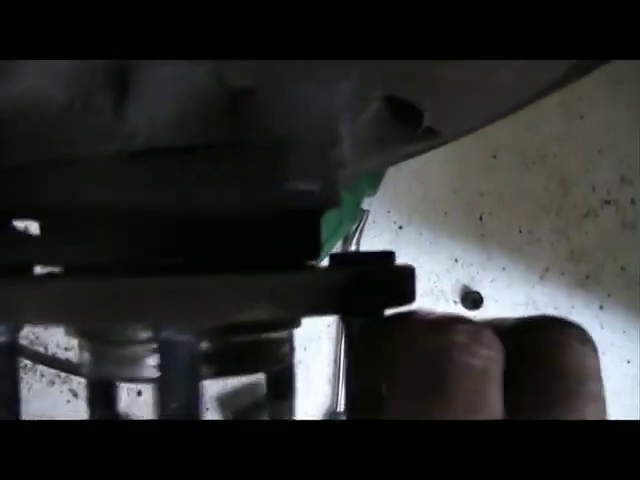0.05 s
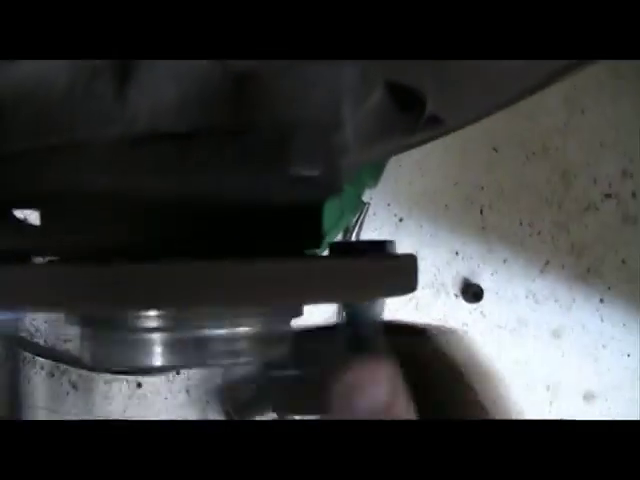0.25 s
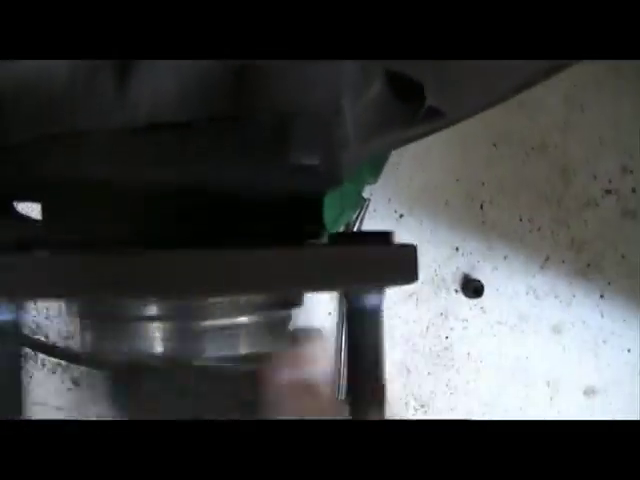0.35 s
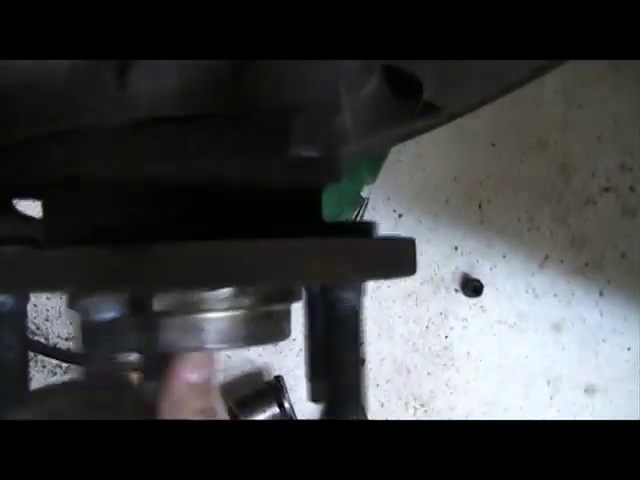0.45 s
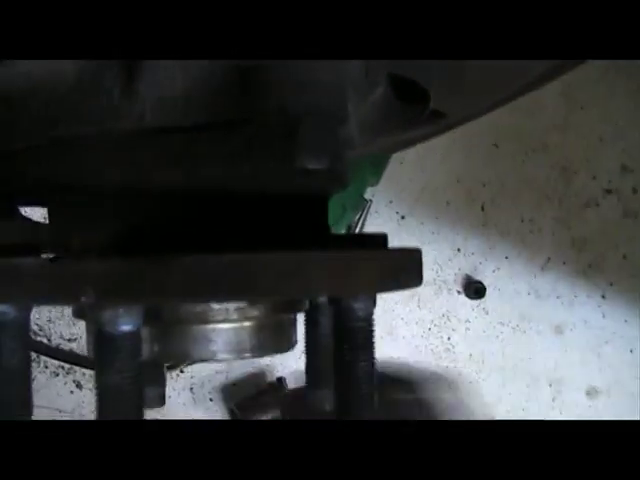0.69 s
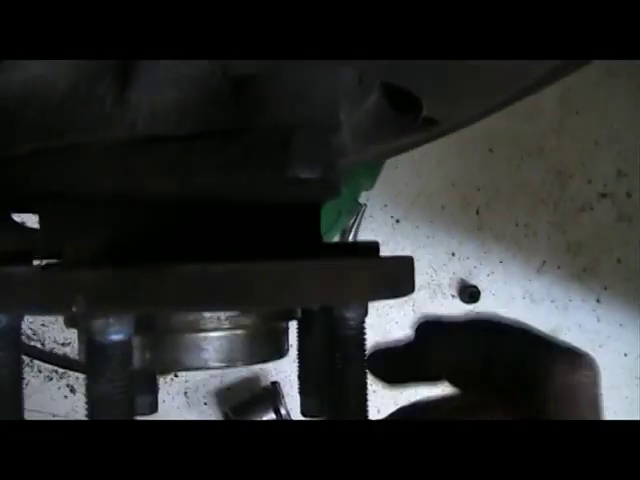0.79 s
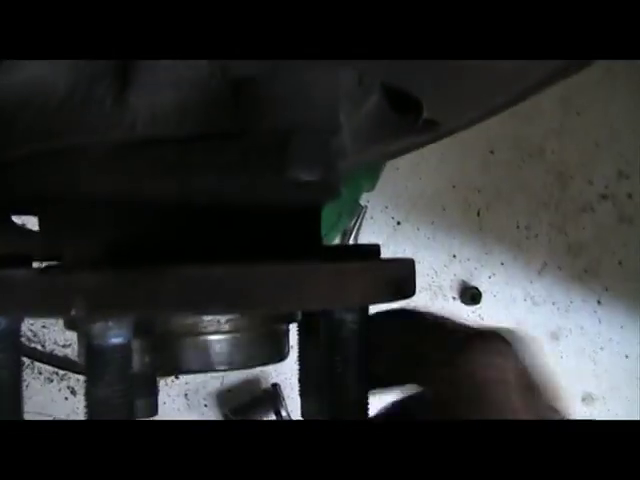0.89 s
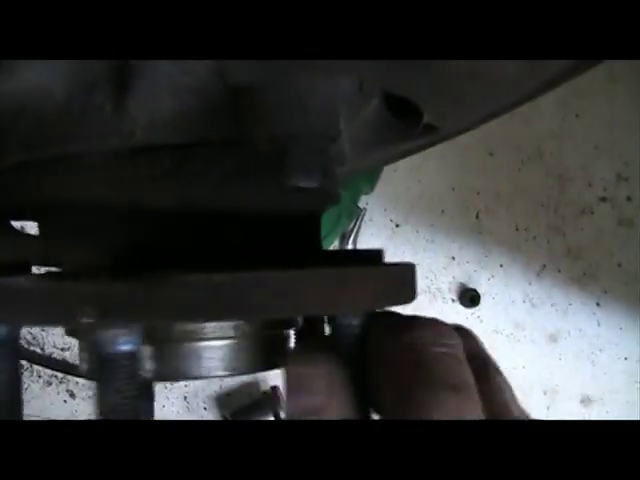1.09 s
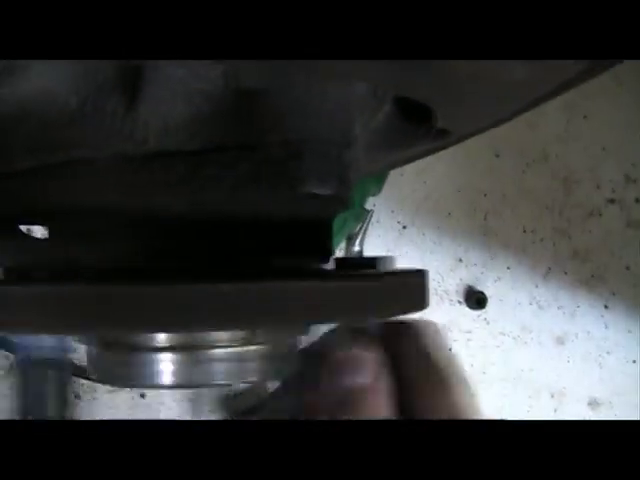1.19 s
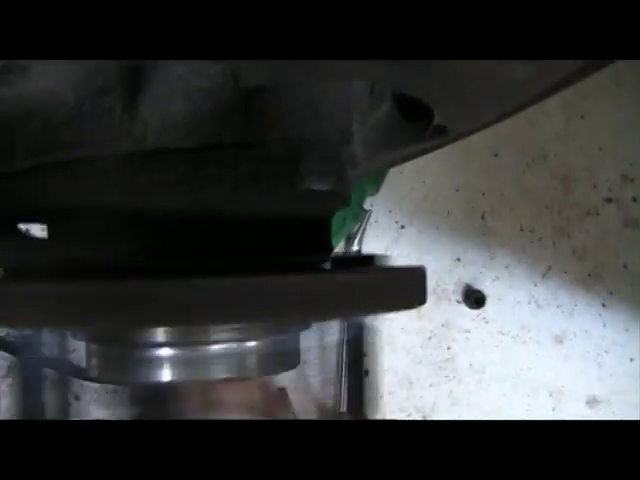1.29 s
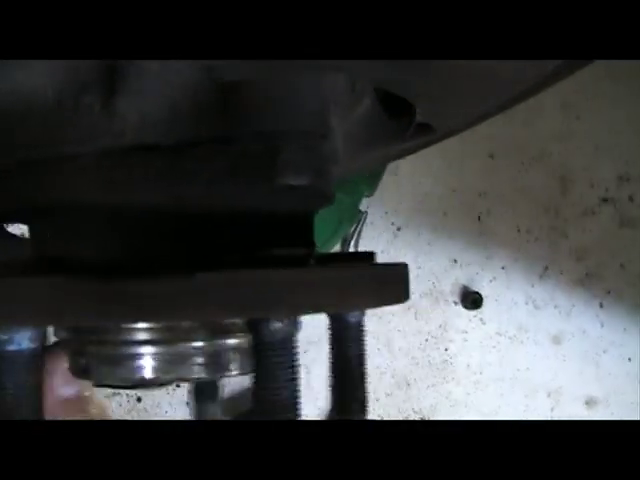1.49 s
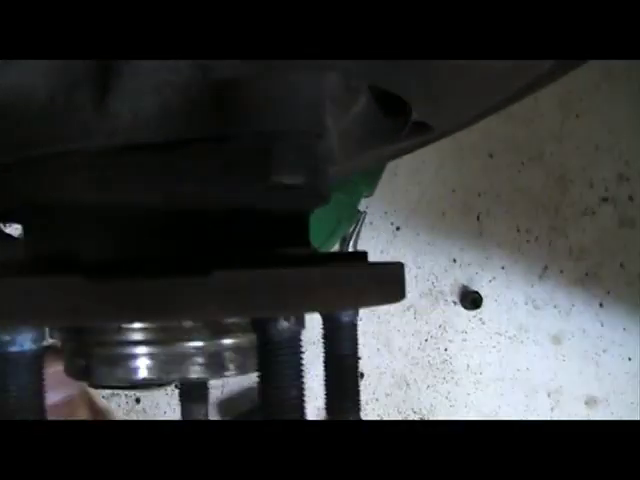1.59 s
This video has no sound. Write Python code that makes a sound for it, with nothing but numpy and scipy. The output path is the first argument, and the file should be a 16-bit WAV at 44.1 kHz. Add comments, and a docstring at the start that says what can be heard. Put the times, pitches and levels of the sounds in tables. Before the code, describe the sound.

A steel wheel hub grinds and rumbles on a worn bearing as a hand turns it twice, close by in a workshop. The first turn ends in a sharp knock with a brief metallic ring; the second fades into a faint whine.

```python
"""A dry scrape swells into a grinding rumble: a steel wheel hub is turned twice by hand, close by in a workshop.
Rollers bump over the worn bearing and shake the suspension; grit crunches and the bearing catches.
The first turn ends in a sharp knock that leaves the hub ringing. After each push the hub coasts with
a drone and a thin whine, and between turns the hand brushes the metal as it takes a new grip."""
import sys
import numpy as np
from scipy import signal
from scipy.fft import rfft, irfft
from scipy.io import wavfile
from scipy.ndimage import uniform_filter1d

SR = 44100
rng = np.random.default_rng(int(sys.argv[2]) if len(sys.argv) > 2 else 0)


def transcribe(u):
    """Save the signal u as a 16-bit wav file named by the first command-line argument.

    u: samples, shape (n,) or (channels, n), limited to [-1, 1]; the rate is SR.
    q: integer samples, one column per channel.
    """
    v = np.clip(np.atleast_2d(u).T, -1, 1)
    q = np.round(v * 32767).astype(np.int16)
    wavfile.write(sys.argv[1], SR, q)


N = 72765
T = np.arange(N) / SR
HZ = np.fft.rfftfreq(2 * N, 1 / SR)


def amp(db):
    """Decibels to gain."""
    return 10 ** (np.asarray(db) / 20)


def unit(x):
    """Scales to rms 1."""
    return x / np.sqrt(np.mean(x ** 2) + 1e-20)


def read(points, hz):
    """Reads a table on a log-frequency axis."""
    f, value = np.transpose(points)
    return np.interp(np.log(hz + 1), np.log(f + 1), value)


def band(hz, octaves):
    """A bell-shaped EQ curve in dB."""
    return np.maximum(-10 * np.log10(np.e) * (np.log2((HZ + 1) / hz) / octaves) ** 2, -70)


def eq(x, db):
    """Filters by a gain in dB at every frequency."""
    return irfft(rfft(x, 2 * N) * amp(db))[..., :N]


def noise(db):
    """Noise of rms 1 with a given colour."""
    return unit(eq(rng.standard_normal(N), db))


def sine(hz, t=T):
    """A sine with a random starting phase."""
    return np.sin(2 * np.pi * (hz * t + rng.random()))


def grains(per_s, spread_db):
    """Random contacts of uneven size and sign."""
    size = amp(spread_db * np.minimum(rng.exponential(1, N), 4))
    return size * rng.choice([-1., 1.], N) * (rng.random(N) < per_s / SR)


def fader(curves):
    """Gain over time from dB curves."""
    return sum(amp(np.interp(T, *np.transpose(c), left=-120, right=-120)) for c in curves)


def strike(start, rise, t60):
    """Envelope with a linear attack and an exponential decay."""
    return np.clip((T - start) / rise, 0, 1) * amp(-60 * np.maximum(T - start - rise, 0) / t60)


def swell(peak_s, half_s):
    """A smooth, bell-shaped envelope."""
    return np.exp(-.5 * ((T - peak_s) / half_s) ** 2)


def excite(x, response):
    """Plays a signal through an impulse response."""
    return signal.fftconvolve(x, response)[:N]


def dying(x, t60s):
    """Lets each band die at its own speed."""
    hz, t, z = signal.stft(x, SR, nperseg=256)
    return signal.istft(z * amp(-60 * t / read(t60s, hz)[:, None]), SR, nperseg=256)[1][:N]


# colour of the room tone, and extra EQ on its stereo side (frequency [Hz], gain [dB])
AIR_EQ = [(20, -8), (55, -3), (240, -1), (320, -4), (1100, -11), (1750, -8), (2300, -12), (4400, -18),
          (10700, -21.5), (16000, -27.5)]
AIR_SIDE_EQ = [(60, -3), (250, 6.5), (14000, 1.5)]
# hum partials (frequency [Hz], level [dB])
HUM_PARTIALS = [(120, -67.5), (240, -62), (360, -70), (600, -69.5)]
def room_tone():
    """Steady workshop air with a low hum."""
    air, side = (amp(-58) * noise(read(AIR_EQ, HZ)) for _ in range(2))
    side = eq(side, read(AIR_SIDE_EQ, HZ))
    hum = sum(np.sqrt(2) * amp(db) * sine(hz) for hz, db in HUM_PARTIALS)
    return air + hum + np.array([side, -side])


# colour of the surrounding steel's high modes (frequency [Hz], gain [dB])
STEEL_EQ = [(1500, -37), (3000, -2.5), (4600, 0.5), (7000, -1), (13000, -35)]
def steel_response(count=150):
    """Impulse response of many random modes; the higher ones die sooner."""
    t = T[:SR // 2]
    hz = np.geomspace(1500, 14000, count) * rng.uniform(.98, 1.02, count)
    db = read(STEEL_EQ, hz) + 3 * rng.standard_normal(count)
    t60 = 0.52 * (hz / 1000) ** -0.49
    modes = sum(amp(d - 60 * t / life) * sine(f, t) for f, d, life in zip(hz, db, t60))
    return modes / np.linalg.norm(amp(db))


GRIP_T60_S = .06  # extra decay from the gripping hand
# scrape envelope, one curve per turn (time [s], relative level [dB])
SCRAPE_CURVES = [
    [(0, -59), (.11, -53.5), (.195, -49), (.212, -38.5), (.255, -41.5), (.28, -38), (.305, -39.5),
     (.338, -34), (.355, -48), (.42, -45), (.47, -65.5), (.62, -68.5), (.80, -60), (1.0, -63)],
    [(1.04, -64), (1.16, -46.5), (1.19, -37), (1.25, -42), (1.30, -38), (1.35, -42.5), (1.364, -35),
     (1.385, -42.5), (1.40, -37.5), (1.412, -53), (1.47, -63), (1.65, -61.5)],
]
# scrape colour (frequency [Hz], gain [dB])
SCRAPE_EQ = [(500, 11), (1800, -10), (3000, -3), (4300, -1), (6500, 0.5), (8500, 5.5), (10500, 0),
             (13000, -3.5), (15500, -18)]
def scrape(steel):
    """Dry steel slides in thousands of tiny slips, which stir the hand-damped metal."""
    slips = unit(eq(grains(per_s=7700, spread_db=2), read(SCRAPE_EQ, HZ)))
    gripped = steel * amp(-60 * T[:len(steel)] / GRIP_T60_S)
    sheen = amp(-3) * unit(excite(slips, gripped))
    return amp(-2) * fader(SCRAPE_CURVES) * (slips + sheen)


# turning effort, one curve per turn (time [s], relative level [dB])
EFFORT_CURVES = [
    [(.08, -66), (.165, -42.5), (.205, -33.5), (.24, -24), (.285, -18.5), (.31, -23.5), (.355, -21),
     (.40, -24.5), (.45, -41.5), (.56, -58)],
    [(1.08, -63), (1.15, -41.5), (1.178, -27.5), (1.205, -22), (1.25, -21.5), (1.29, -24), (1.335, -28),
     (1.37, -26), (1.40, -33.5), (1.43, -43), (1.55, -63)],
]
# low resonances of hub and suspension (frequency [Hz], relative level [dB], t60 [s])
LOW_MODES = [(53.5, -24, 0.37), (102.4, -25.5, 0.46), (147.5, -23.5, 1), (207.2, -6.5, 0.3),
             (238.3, -2, 0.2), (273, 1, 0.12), (291.8, 0.5, 0.13), (327.8, 1.5, 0.11), (375.2, -4, 0.28),
             (403.3, -8, 0.26), (432.3, -5, 0.1)]
def rumble():
    """Rollers bump over the worn race and shake the low resonances."""
    body = sum((-1) ** k * amp(db - 60 * T / t60) * np.sin(2 * np.pi * hz * T) / np.sqrt(t60)
               for k, (hz, db, t60) in enumerate(LOW_MODES))
    shaking = unit(excite(grains(per_s=680, spread_db=4.5), body))
    power = abs(uniform_filter1d(shaking ** 2, int(0.0198 * SR)))
    shaking /= np.sqrt(power + 0.028)  # compress, so the effort sets the dynamics
    return amp(-2) * fader(EFFORT_CURVES) * shaking


# drone envelope, one curve per turn (time [s], level [dB])
DRONE_CURVES = [
    [(.1, -64), (.27, -45.5), (.44, -39.5), (.56, -62.5), (.69, -50), (1.0, -66)],
    [(1.1, -57), (1.25, -37), (1.40, -42.5), (1.48, -54), (1.65, -58)],
]
def drone():
    """The spinning hub drones hollowly under the rumble and carries on after each push."""
    return fader(DRONE_CURVES) * noise(band(160, octaves=0.36))


# crunch envelope, one curve per turn (time [s], level [dB])
GRIT_CURVES = [
    [(.12, -68), (.21, -45.5), (.24, -42), (.287, -31), (.305, -36), (.36, -37), (.46, -60)],
    [(1.14, -53.5), (1.222, -47.5), (1.25, -36.5), (1.275, -41), (1.315, -40.5), (1.38, -50), (1.43, -58.5)],
]
# crunch colour (frequency [Hz], gain [dB])
GRIT_EQ = [(200, -13), (500, 4), (740, 4.5), (860, -6.5), (1030, 6.5), (1180, -9), (1340, 3.5),
           (3000, -16.5), (5000, -10), (9000, -30)]
def grit():
    """Grit is crushed at the height of each push and makes the gripped hub sing."""
    cracks = grains(per_s=1000, spread_db=2)
    crunch = unit(eq(cracks, read(GRIT_EQ, HZ)))
    gripped = sum(amp(db - 60 * T * (1 / t60 + 1 / GRIP_T60_S)) * sine(hz) for hz, db, t60 in HUB_MODES)
    sing = amp(-2.5) * unit(eq(excite(cracks, gripped), band(2460, octaves=1)))
    return fader(GRIT_CURVES) * (crunch + sing)


# finger scuffs (time [s], half length [s], level [dB])
FINGER_SCUFFS = [(0.156, 0.013, -45), (1.454, 0.011, -51.5)]
def scuffs():
    """Fingers scuff on the studs in soft puffs of noise."""
    envelope = sum(amp(db) * swell(s, half) for s, half, db in FINGER_SCUFFS)
    return envelope * noise(band(3600, octaves=0.86))


# bearing snaps, a small last blow of the first knock at 0.381 s, and a light knock of the hand around
# 1.227-1.246 s (time [s], level [dB], centre [Hz], width [octaves], t60 [s])
SNAPS_AND_SMALL_KNOCKS = [(0.266, -27.5, 7100, 0.58, .035), (0.282, -31, 1360, 0.08, 0.097),
                          (.381, -33.5, 3580, 0.18, 0.057), (1.176, -32, 6900, .63, 0.026),
                          (1.227, -31.5, 5370, 0.5, 0.076), (1.227, -25.5, 870, 0.73, 0.041),
                          (1.24, -34, 810, 0.33, 0.12), (1.2453, -33.5, 2920, 0.67, 0.077),
                          (1.246, -35, 4270, 0.078, 0.13), (1.3614, -37.5, 8700, 0.34, 0.12)]
def catches():
    """Short gritty snaps as the bearing sticks and lets go, with a small last blow of the first knock and a
    light knock of the hand in the second turn."""
    return sum(amp(db) * strike(s, 0.00041, t60) * noise(band(hz, width))
               for s, db, hz, width, t60 in SNAPS_AND_SMALL_KNOCKS)


def thump(start, size_db, rise_s=0.01146, decay_speed=0.73):
    """One shove shakes all the low resonances in phase; they ring longer than in the rumble."""
    since_peak = T - start - rise_s
    modes = sum(amp(db) * strike(start, rise_s, t60 / decay_speed) * np.sin(2 * np.pi * hz * since_peak)
                for hz, db, t60 in LOW_MODES)
    return amp(size_db) * modes / np.sqrt(len(LOW_MODES))


# low-end hits (time [s], relative level [dB])
SUSPENSION_JOLTS = [(.275, -21.5), (1.24, -19)]
def jolts():
    """A heavy jolt goes through the suspension at the height of each push."""
    return sum(thump(s, db) for s, db in SUSPENSION_JOLTS)


BLOW_RISE_S = 0.0007
# a glancing blow, then a full one (time [s], level [dB])
KNOCK_BLOWS = [(.3638, -26.5), (0.3672, -19.5)]
# colours of the contact crack and of the clang (frequency [Hz], gain [dB])
CRACK_EQ = [(400, -9), (4700, -3), (5900, 9), (7300, -3), (9500, -6), (10750, 1.5), (11900, -6),
            (13100, 8.5), (13800, -15)]
CLANG_EQ = [(150, -34), (500, 0), (1100, -0.5), (1400, 12.5), (1800, 0.5), (3000, -3), (7000, -1.5),
            (10000, -12), (15000, -40)]
# clang decay (frequency [Hz], t60 [s])
CLANG_DECAY = [(300, 0.22), (1200, 0.11), (4000, 0.061), (14000, 0.093)]
def knock(steel):
    """A bright crack at contact, a clang of dense modes at each blow, and a thump in the suspension."""
    hit = amp(-20) * strike(start=.3595, rise=0.0012, t60=0.053) * noise(read(CRACK_EQ, HZ))
    shimmer = amp(-14) * np.pad(steel, (0, N - len(steel)))
    for s, db in KNOCK_BLOWS:
        clang = dying(noise(read(CLANG_EQ, HZ)), CLANG_DECAY) + shimmer
        clang *= np.minimum(T / BLOW_RISE_S, 1)
        hit += amp(db) * np.pad(clang, (round(s * SR), 0))[:N]
    return hit + thump(start=.366, size_db=-14.5)


# ringing modes of the free hub (frequency [Hz], relative level [dB], t60 [s])
HUB_MODES = [(585, -8.5, 0.18), (766, -17, 0.68), (921, -19.5, 0.98), (978.4, 3, 0.066), (1381, 0, 0.49),
             (1449, -3.5, 0.23), (1633, -29.5, 1), (2108, -11.5, 0.22), (2336, -1.5, 0.14),
             (2845, -9.5, 0.19), (3473, -10, 0.22), (3580, -15, 0.31), (3870, -12, 0.21), (4035, -9, 0.17),
             (4256, -16, 0.16), (4760, -8, 0.14)]
def ring():
    """The hub rings on after the last blow."""
    start, _ = KNOCK_BLOWS[-1]
    modes = sum(amp(db) * strike(start, BLOW_RISE_S, t60) * sine(hz) for hz, db, t60 in HUB_MODES)
    return amp(-24.5) * modes


# the hand lets go (time [s])
RELEASE_TIMES = [0.46, 1.37]
# tones of the coasting hub: low bearing tones and thin high rings of the metal (frequency [Hz], level [dB])
WHINE_TONES = [(361, -54.5), (927, -65.5), (1620, -64), (6121, -67), (7752, -79), (11041, -77)]
def whine(waver_depth_hz=10, waver_rate_hz=19):
    """Thin, wavering tones of the bearing and the metal swell after each push and fade as the hub slows."""
    spin = sum(strike(s, rise=0.094, t60=2.06) for s in RELEASE_TIMES)
    tones = np.zeros(N)
    for hz, db in WHINE_TONES:
        pitch = hz + waver_depth_hz * noise(band(waver_rate_hz, octaves=1))
        tones += np.sqrt(2) * amp(db) * np.sin(2 * np.pi * np.cumsum(pitch) / SR)
    return spin * tones


# touches of the hand between turns (time [s], half length [s], level [dB])
HAND_BRUSHES = [(0.867, 0.0037, -57), (.94, 0.015, -49.5)]
# airy colour of skin on steel (frequency [Hz], gain [dB])
BRUSH_EQ = [(500, -27), (2500, -17), (3800, -5), (6000, -6.5), (9000, 5), (11500, -8)]
def brushes():
    """Skin slides lightly over the metal as the hand takes a new grip."""
    envelope = sum(amp(db) * swell(s, half) for s, half, db in HAND_BRUSHES)
    return envelope * noise(read(BRUSH_EQ, HZ))


# faint squeaks (time [s], half length [s], centre [Hz], level [dB])
BEARING_SQUEAKS = [(1.05, 0.014, 3340, -64), (1.614, 0.049, 3180, -60.5)]
def squeaks(steel):
    """The dry bearing rubs in a narrow band and stirs a few modes of the steel."""
    return sum(amp(db) * swell(s, half) * unit(excite(noise(band(hz, octaves=0.15)), steel))
               for s, half, hz, db in BEARING_SQUEAKS)


# reverb decay (frequency [Hz], t60 [s])
REVERB_DECAY = [(100, 3.1), (400, 1.5), (3500, 1.48), (8000, 0.72)]
# reverb return EQ (frequency [Hz], gain [dB])
REVERB_EQ = [(60, -7), (150, -19.5), (280, -37), (600, -15.5), (1300, -24), (1700, -14), (4000, -24),
             (12000, -54)]
def reverb(x):
    """The workshop's faint tail, different at each ear."""
    fade_in = np.minimum(T / 0.0024, 1)
    tails = [dying(rng.standard_normal(N), REVERB_DECAY) * fade_in for _ in range(2)]
    return np.array([excite(x, eq(tail / np.linalg.norm(tail), read(REVERB_EQ, HZ))) for tail in tails])


# stereo width, as EQ on the side signal (frequency [Hz], gain [dB])
WIDTH_EQ = [(60, -37), (250, -28), (600, -11.5), (2500, -15.5), (5000, -7), (9000, -7), (14000, 2.5)]
# lean to the right (frequency [Hz], left minus right [dB])
PAN_EQ = [(300, -1.9), (550, -0.93), (1300, -1.5), (13000, -0.21)]
def scene():
    """The hub radiates from many points, so its treble is wider than its bass."""
    steel = steel_response()
    mid, side = (rumble() + grit() + scrape(steel) + catches() + knock(steel) + ring()
                 + squeaks(steel) + drone() + whine() + brushes() + scuffs() for _ in range(2))
    mid += jolts()
    side = irfft(1j * rfft(side, 2 * N) * amp(read(WIDTH_EQ, HZ)))[:N]  # 1j: a quarter-cycle shift
    lean_db = read(PAN_EQ, HZ) / 2
    direct = np.array([eq(mid + side, lean_db), eq(mid - side, -lean_db)])
    return direct + reverb(mid) + room_tone()


def record(dry, low_cut_hz=40, high_cut_hz=15900):
    """A low cut trims the sub-bass and a steep high cut trims the top."""
    trimmed = signal.sosfilt(signal.butter(3, low_cut_hz, "high", fs=SR, output="sos"), dry)
    high_cut = signal.firwin(511, high_cut_hz, window=("kaiser", 9), fs=SR)
    return signal.oaconvolve(trimmed, high_cut[None], "same")


dry = scene()
out = record(dry)
transcribe(out)
```